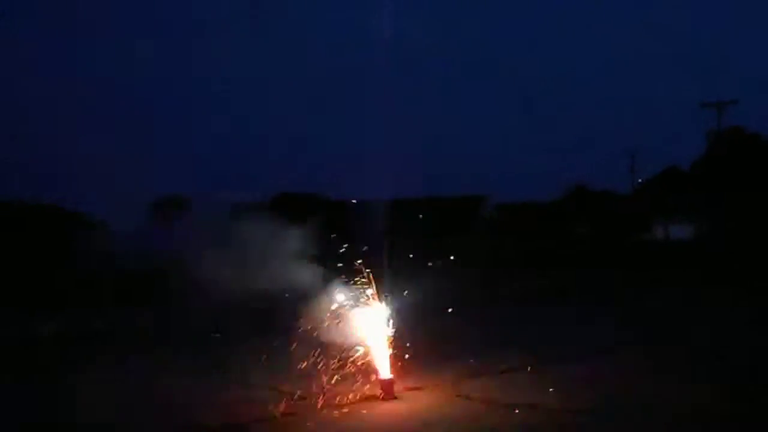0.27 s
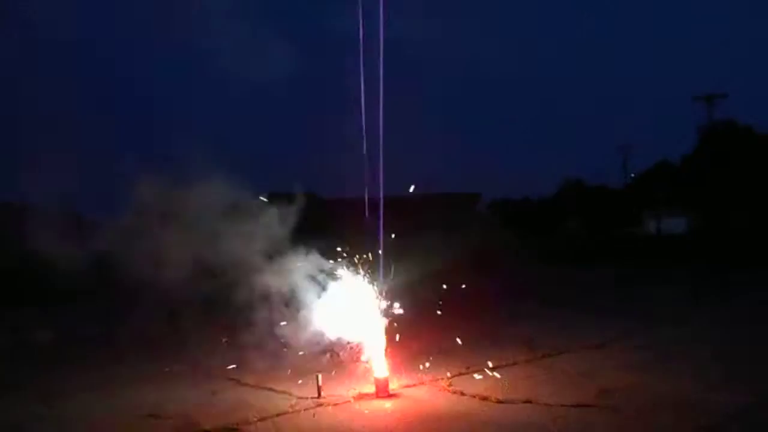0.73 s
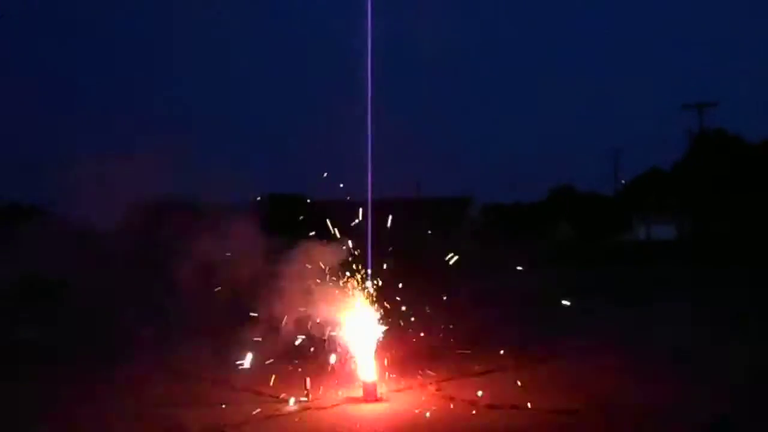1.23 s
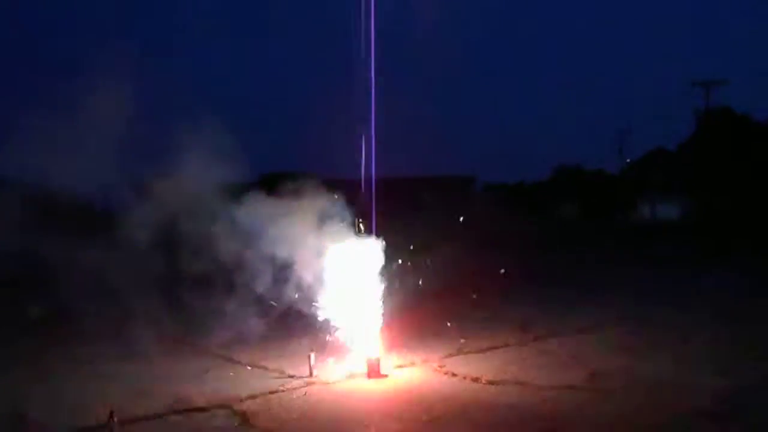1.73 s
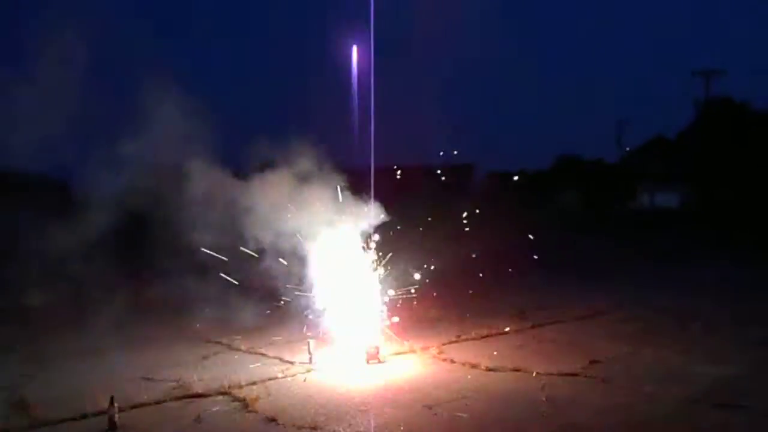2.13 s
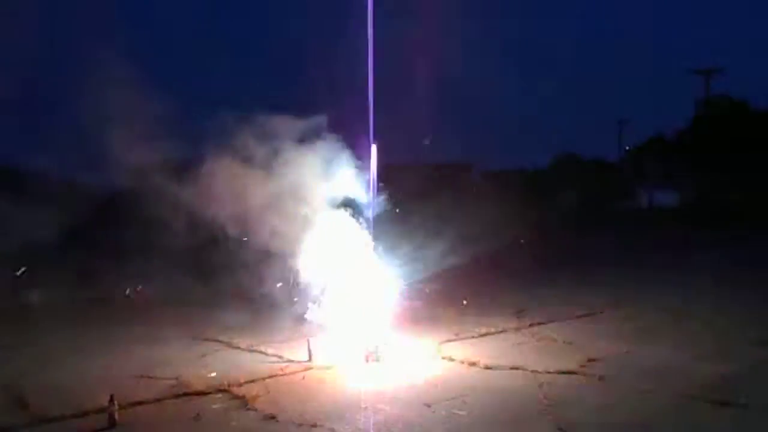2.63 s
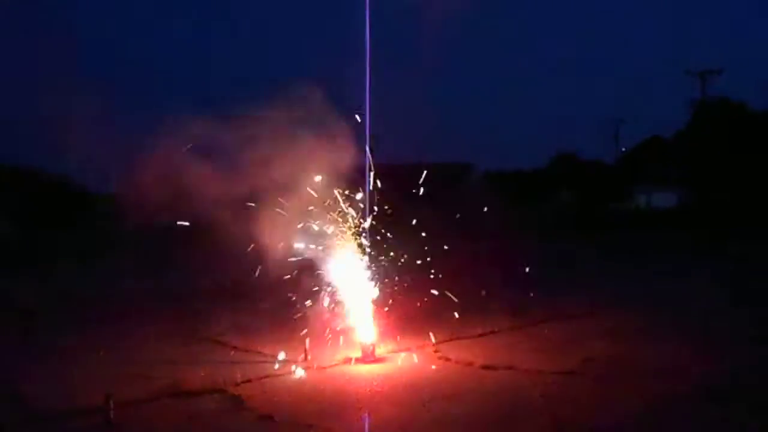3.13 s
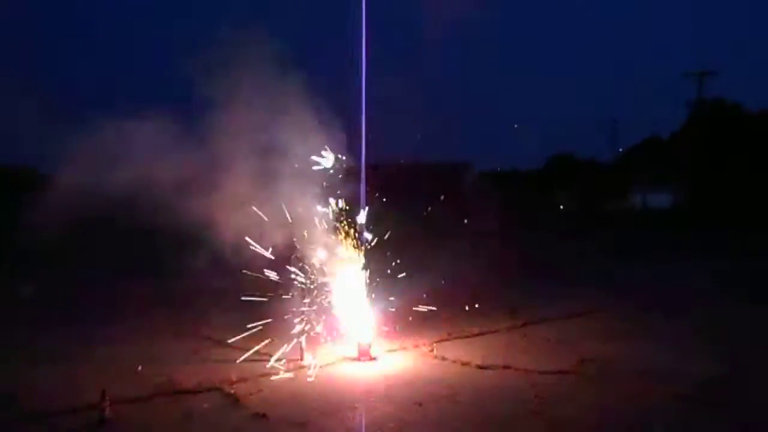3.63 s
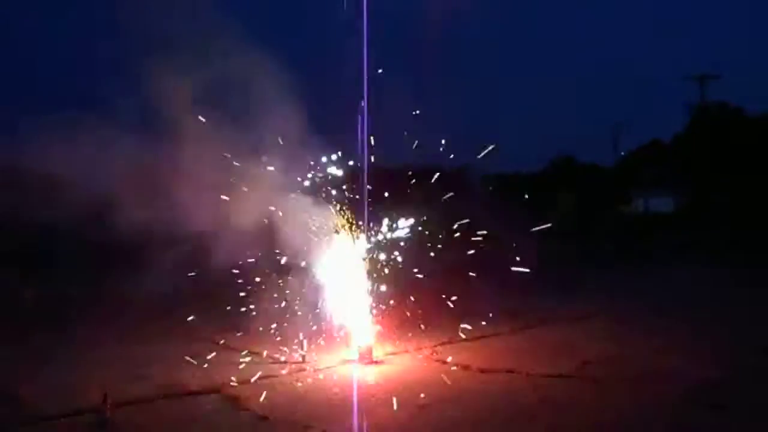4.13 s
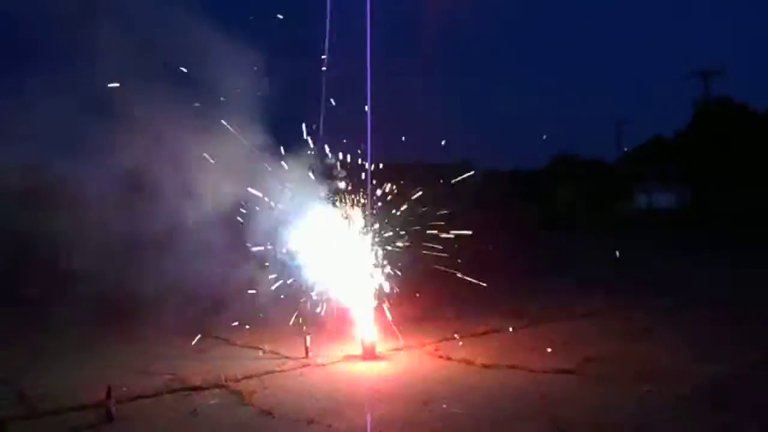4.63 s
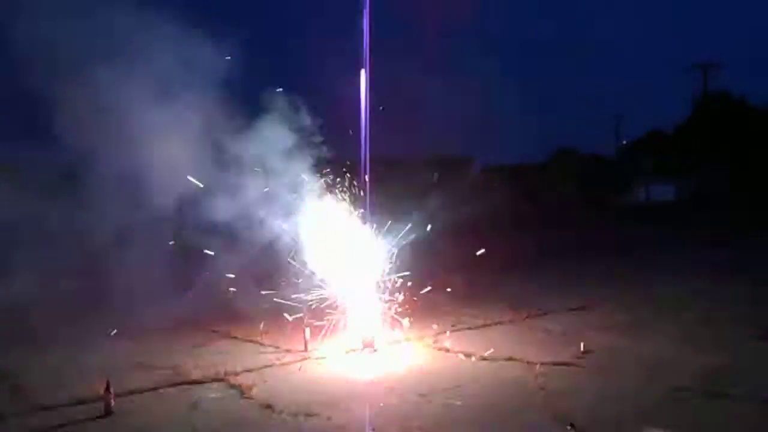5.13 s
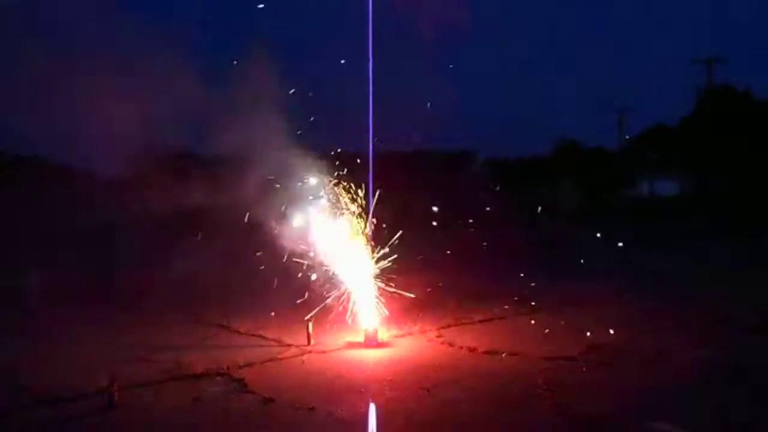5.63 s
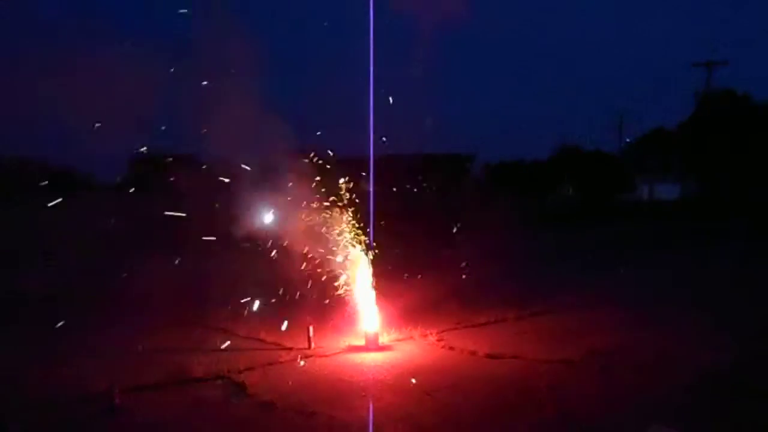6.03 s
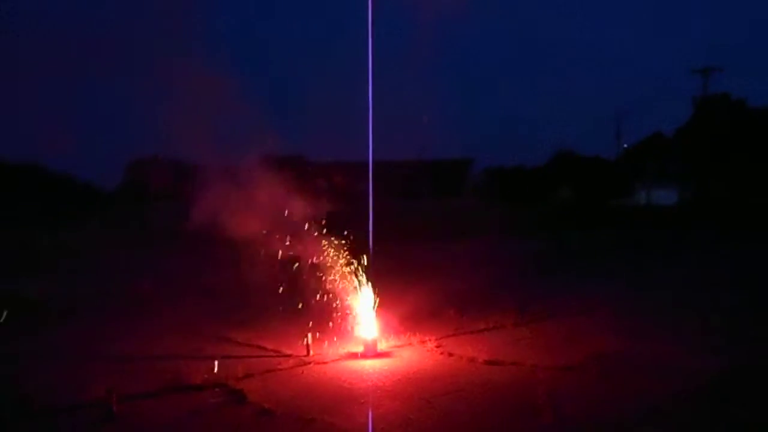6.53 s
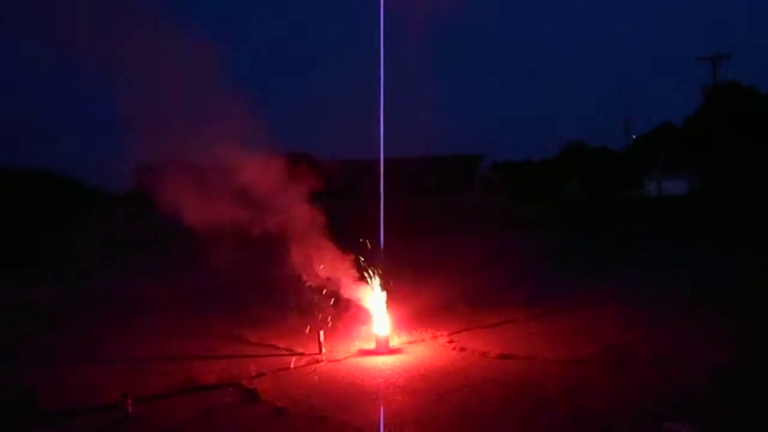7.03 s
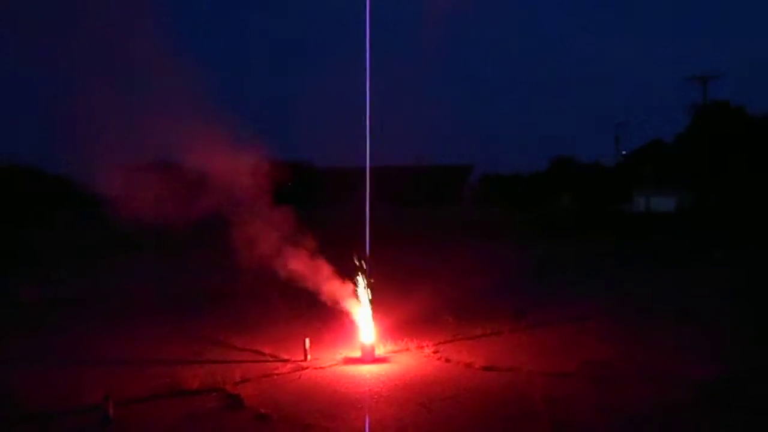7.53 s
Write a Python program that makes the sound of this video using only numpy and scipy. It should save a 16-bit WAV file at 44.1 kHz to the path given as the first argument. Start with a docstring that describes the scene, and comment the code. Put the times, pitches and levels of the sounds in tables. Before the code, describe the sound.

Sharp, irregular firework pops over a faint pulsing hiss give way to a few dull thuds and a louder, steady hiss.

```python
"""Sharp cracks over a soft hiss: a fountain firework burns on a concrete yard, a few metres from a camera.
Its jet of gas swells as each pellet catches and throws out stars, sparks that burst with a tiny shock.
Each crack arrives twice, directly and off the ground, and the loud ones overload the microphone.
A breeze rumbles and a low hum comes and goes. Near the end the stars die out, the nozzle thuds
a few times as the last charge lights, and the hiss grows loud."""
import sys
import numpy as np
from scipy.fft import rfft, irfft, next_fast_len
from scipy.io import wavfile
from scipy.ndimage import map_coordinates

SR = 44100
rng = np.random.default_rng(int(sys.argv[2]) if len(sys.argv) > 2 else 0)


def int16_out(signal):
    """Quantize to a 16-bit WAV file."""
    q = np.round(np.clip(np.atleast_2d(signal).T, -1, 1) * 32767)
    wavfile.write(sys.argv[1], SR, q.astype(np.int16))


N = 342657

# a low hum comes and goes: (time [s], pitch [Hz], level [dB])
HUM_PATH = [(0, 98, -38.5), (1.3, 96.1, -49), (1.6, 92.1, -42.5), (2.2, 89.1, -34.5), (2.5, 92.1, -59),
            (6.3, 135.1, -71), (6.8, 142, -41), (7.77, 139.8, -46.5)]
# a light breeze on the microphone dies down and returns: (time [s], relative level [dB])
BREEZE_LEVELS = [(0, -38), (1.4, -36.5), (1.8, -40.5), (3.0, -40), (3.45, -48), (5.5, -48.5), (6.2, -56.5),
                 (6.4, -39.5), (7.77, -38.5)]
# brief gusts on top of it: (time of peak [s], level [dB])
GUST_PEAKS = [(0.73, -33.5), (1.15, -28.5), (3.73, -35.5)]
# the tone of air pushing on the microphone: (frequency [Hz], relative level [dB])
RUMBLE_SPECTRUM = [(8, -4), (25, 3.5), (45, 2.5), (70, -2), (95, -2), (130, -7), (200, -14.5), (400, -18),
                   (1500, -78)]
# the steady flame sinks halfway through: (time [s], relative level [dB])
FLAME_LEVELS = [(0, -55), (3.0, -52), (3.45, -61.5), (6.2, -59)]
# pellets catch in turn and make the jet flare: (start [s], relative level [dB], burning time [s])
PELLET_BURNS = [(-0.04, -43, 0.13), (0.55, -46.5, 0.38), (0.98, -41.5, 0.23), (1.55, -41.3, 0.32),
                (1.86, -41.5, 0.26), (2.69, -40, 0.15), (3.61, -43.5, 0.34), (4.39, -42, 0.18),
                (5.08, -40.5, 0.17), (5.51, -50.5, 0.32)]
# the hiss as heard, its treble cut off sharply near 12.5 kHz: (frequency [Hz], relative level [dB])
HISS_SPECTRUM = [(300, -31), (1000, 0.5), (1700, 3), (2600, 1.5), (3600, -1), (5000, -1.5), (6500, -5),
                 (8000, -5.5), (10000, -14), (12200, -19), (12700, -48)]
# the tone of the flame: (frequency [Hz], relative level [dB])
ROAR_SPECTRUM = [(60, -38), (140, 0), (250, -1.5), (400, 1.5), (700, 1), (1200, -5), (2000, -16),
                 (5000, -46)]
# the jet's sound moves down into the nozzle as the stars stop: (time [s], clean ground echo [share])
JET_ECHO_SHARE = [(0, .42), (6.4, .42), (7.1, .7)]
# echoes from close to the camera: (delay [ms], relative level [dB])
NEAR_ECHOES = [(2.25, -17), (3.1, -11.5), (3.9, -33), (14.8, -24)]
# dull echoes from things around the yard: (delay [ms], relative level [dB])
FAR_ECHOES = [(21, -31), (34, -26)]
# a bright slap back from a distant wall: (delay [ms], relative level [dB])
WALL_ECHO = [(84.5, -22.5)]
# cracks of stars (the higher the star, the later its ground echo), then six dull thuds in the nozzle:
# (time [s], relative level [dB], shock length [ms], echo delay [ms])
CRACKS_AND_THUDS = [(0.129, 7.5, 0.028, 0.26), (0.1444, 11, 0.066, 0.3), (0.2057, 18.5, 0.0069, 0.33),
                    (0.2413, 8.5, 0.028, 0.46), (0.4115, 3, 0.026, 0.3), (0.4429, 3, 0.034, 0.31),
                    (0.6342, -17.5, 0.14, 0.3), (0.693, -14, 0.22, 0.29), (0.7629, -11.5, 0.031, 0.33),
                    (0.8086, 16.5, 0.029, 0.76), (0.8273, 6.5, 0.03, 0.31), (1.1611, 22, 0.027, 0.51),
                    (1.2602, 11.5, 0.047, 0.54), (1.3319, 8, 0.035, 0.31), (1.3615, 14.5, 0.03, 0.45),
                    (1.7554, 21.5, 0.019, 0.7), (2.0658, 22, 0.037, 0.62), (2.1388, 9, 0.11, 0.83),
                    (2.1918, 1.5, 0.059, 0.33), (2.2363, 8.5, 0.028, 0.37), (2.3462, 8.5, 0.054, 0.717),
                    (2.3963, 4.5, 0.1, 0.85), (2.4162, 3, 0.087, 0.87), (2.6037, -5, 0.098, 0.99),
                    (2.8539, 23, 0.028, 0.78), (2.892, 13.5, 0.054, 0.65), (2.9058, 15, 0.008, 0.32),
                    (2.9727, 8, 0.018, 0.31), (3.0213, -13.6, 0.059, 0.34), (3.045, 13.5, 0.012, 0.66),
                    (3.1765, -7.5, 0.037, 0.33), (3.2173, 6.5, 0.02, 1.07), (3.2408, -3.5, 0.016, 0.31),
                    (3.2868, 8.5, 0.029, 0.96), (3.4164, 0.5, 0.031, 0.65), (3.4433, 5.5, 0.026, 0.9),
                    (3.4463, 4, 0.031, 1.16), (3.8029, 13.5, 0.05, 0.86), (3.9355, 14, 0.022, 0.78),
                    (3.9789, 11, 0.029, 0.95), (4.0689, 11.5, 0.032, 1.02), (4.1939, 5, 0.031, 0.48),
                    (4.2047, 8, 0.02, 1.08), (4.2339, -1.5, 0.044, 1.17), (4.2447, 2, 0.052, 0.87),
                    (4.5105, 15.5, 0.013, 0.97), (4.6121, 10, 0.059, 2.27), (4.6685, 6, 0.029, 1.13),
                    (4.7167, 5, 0.045, 0.92), (4.7768, 5, 0.026, 1.51), (4.8902, -10.5, 0.053, 0.34),
                    (4.9452, 5, 0.014, 0.74), (4.9584, 6, 0.021, 1.22), (5.2375, 13, 0.029, 0.59),
                    (5.3087, 7, 0.022, 0.46), (5.3252, 7.5, 0.028, 0.76), (5.3513, 8.5, 0.037, 1.15),
                    (5.4892, 14, 0.015, 0.92), (5.4927, 11, 0.022, 1.21), (5.6685, 7.5, 0.028, 0.42),
                    (5.831, 3, 0.019, 0.83), (5.8704, 3.5, 0.037, 1.77), (5.8809, 4, 0.04, 1.18),
                    (5.9655, 9, 0.019, 1.6), (6.0864, 6.5, 0.012, 0.99), (6.3305, -2.5, 0.37, 2.44),
                    (6.4595, -11, 0.35, 0.74), (6.571, -16, 0.5, 2.87), (6.779, -10.5, 0.33, 1.08),
                    (6.887, -12.5, 0.32, 2.2), (6.938, -13, 0.24, 0.84)]
# the camera dulls the highest treble: (frequency [Hz], gain [dB])
CAMERA_TONE = [(20, 1.5), (9900, 1), (10500, -3), (11000, -14.5), (11800, -12), (12500, -29),
               (15500, -28.5)]
TOP_HZ = 16800  # the camera keeps nothing above this


def amp(db):
    """Turn decibels into a factor to multiply by."""
    return 10 ** (np.asarray(db) / 20)


def unit(x):
    """Scale a signal to an average (rms) level of 1."""
    return x / np.sqrt(np.mean(x ** 2) + 1e-20)


def along(points, hz):
    """Gain at each frequency, joining (frequency [Hz], level [dB]) points on a log axis."""
    point_hz, db = np.transpose(points)
    return amp(np.interp(np.log(hz + 1), np.log(point_hz + 1), db))


def curve(rows):
    """Join (time [s], value) rows with straight lines, one value per sample."""
    return np.interp(np.arange(N) / SR, *np.transpose(rows))


def wobble(rate):
    """A smooth curve through `rate` random values a second."""
    return map_coordinates(rng.standard_normal(int(N * rate / SR) + 4), [np.arange(N) * rate / SR])


def filtered(x, response):
    """Apply a filter: response(hz) says how each frequency is scaled and delayed."""
    size = next_fast_len(N + SR // 2)
    return irfft(rfft(x, size) * response(np.fft.rfftfreq(size, 1 / SR)), size)[:N]


def noise(spectrum):
    """Noise with the given tone, at level 1."""
    return unit(filtered(rng.standard_normal(N), lambda hz: along(spectrum, hz)))


def lag(hz, ms):
    """A filter that delays the sound."""
    return np.exp(-2j * np.pi * hz * ms / 1000)


def relax(hz, ms):
    """A filter that makes a click die away over about `ms`, dulling it."""
    return 1 / (1 + 2j * np.pi * hz * ms / 1000)


def resonance(hz, centre_hz, q):
    """A filter that rings at one pitch, longer for a higher q."""
    return 1j * hz * centre_hz / q / (centre_hz ** 2 - hz ** 2 + 1j * hz * centre_hz / q)


def hum(waver_db, drift_hz):
    """A low drone that wavers in level and pitch."""
    times, hz, db = np.transpose(HUM_PATH)
    pitch = curve(np.c_[times, hz]) + drift_hz * wobble(22)
    level_db = curve(np.c_[times, db]) + waver_db * wobble(12)
    return amp(level_db) * np.sin(2 * np.pi * np.cumsum(pitch) / SR)


def rumble(breeze_db, flare_db, lumps_db, gust_half_s=0.11):
    """Air hits the microphone in soft lumps: the breeze, its gusts and a low puff with every flare."""
    t = np.arange(N) / SR
    breeze = amp(curve(BREEZE_LEVELS) + breeze_db)
    gusts = sum(amp(db) * np.exp(-((t - peak_s) / gust_half_s) ** 2) for peak_s, db in GUST_PEAKS)
    puffs = amp(flare_db) * np.sqrt(pellets())
    lumps = unit(amp(lumps_db * wobble(13)) * noise(RUMBLE_SPECTRUM))
    return np.hypot(breeze + gusts, puffs) * lumps


def pellets(catch_s=0.17, fade_db_per_s=52):
    """Power of the jet's flares: each pellet catches, burns and fades once spent."""
    t, power = np.arange(N) / SR, np.zeros(N)
    for start_s, db, burn_s in PELLET_BURNS:
        rise = np.clip((t - start_s) / catch_s, 0, 1)
        spent_s = np.maximum(t - start_s - burn_s, 0)
        power += (rise * amp(db - fade_db_per_s * spent_s)) ** 2
    return power


def last_charge(start_s=6.257, catch_s=0.034, settle_s=0.47, full_db=-27, growth_db=23):
    """Power of the last charge: it catches at once, then grows into the loud hiss."""
    age = np.maximum(np.arange(N) / SR - start_s, 0)
    level_db = full_db - growth_db * np.exp(-age / settle_s)
    return (np.minimum(age / catch_s, 1) * amp(level_db)) ** 2


def jet(hiss_db, roar_db, roar_slope, sputter_db, ground_ms=0.316):
    """Gas hisses from the nozzle and roars in the flame; its ground echo cancels some frequencies."""
    thrust_db = 10 * np.log10(amp(curve(FLAME_LEVELS)) ** 2 + pellets() + last_charge())
    sputter = sputter_db * wobble(170) + .5 * wobble(25)
    hiss = amp(thrust_db + hiss_db + sputter) * noise(HISS_SPECTRUM)
    # a slope below 1 makes the roar grow more slowly than the hiss
    roar = amp(roar_slope * thrust_db + roar_db + sputter + 0.32 * wobble(40)) * noise(ROAR_SPECTRUM)
    gas, share = hiss + roar, curve(JET_ECHO_SHARE)
    echo = filtered(gas, lambda hz: lag(hz, ground_ms))
    return (gas + share * echo) / np.hypot(1, share)


def smear(fade_s, count, size):
    """Rough surfaces scatter each click into its own noise, which falls 60 dB in fade_s."""
    dying = rng.standard_normal((count, size)) * amp(-60 * np.arange(size) / SR / fade_s)
    return rfft(dying / np.linalg.norm(dying, axis=1, keepdims=True))


def echoes(table, hz, count):
    """Delayed copies, timed a little differently for each burst."""
    return sum(amp(db) * lag(hz, ms + 0.16 * rng.standard_normal((count, 1))) for ms, db in table)


def yard(hz, count, size):
    """One filter per burst for its paths to the camera: straight there and bounced around the yard."""
    near = echoes(NEAR_ECHOES, hz, count) * (0.58 + 0.52 * smear(0.0059, count, size)) * relax(hz, 0.038)
    far_tone = (0.23 + resonance(hz, centre_hz=1500, q=3.1)) * relax(hz, 0.023)
    far = echoes(FAR_ECHOES, hz, count) * (0.86 + 0.63 * smear(0.0058, count, size)) * far_tone
    slap = echoes(WALL_ECHO, hz, count) * smear(0.006, count, size) * 0.89 * relax(hz, 0.047)
    scatter = amp(-15) * smear(0.045, count, size) * relax(hz, 0.0061)
    tail = amp(-28.5) * smear(0.19, count, size) * relax(hz, 0.011)
    camera_ring = amp(-2) * smear(0.0023, count, size) * resonance(hz, centre_hz=5320, q=0.83)
    return 1 + near + far + slap + scatter + tail + camera_ring


def microphone(hz):
    """Shocks ring the microphone's opening and hollow case; its membrane swings back slowly."""
    opening = (1 + 1.18 * resonance(hz, centre_hz=9060, q=1.64)) * relax(hz, 0.014)
    case = 1 + 0.26 * resonance(hz, centre_hz=640, q=5.4)
    bass_hz, bass_q = 140, 0.65
    swing = hz ** 2 / (bass_hz ** 2 - hz ** 2 + 1j * hz * bass_hz / bass_q)
    return opening * case * swing


def sparks(loudest_db, spread_db, length_ms, count=100, end_s=6.1):
    """Faint sparks snap at random times and heights: rows like those of CRACKS_AND_THUDS."""
    when, faintness, length, height = rng.random((count, 4)).T
    level_db = loudest_db - spread_db * np.sqrt(faintness)
    return np.c_[when * end_s, level_db, length_ms * (.5 + length), .3 + height]


def shocks(bursts, echo_share, rounding, size=8192):
    """Each burst is a jump in air pressure that dies away, followed by a quick echo."""
    hz, out = np.fft.rfftfreq(size, 1 / SR), np.zeros(N + size)
    times, db, length_ms, echo_ms = np.transpose(bursts)[..., None]
    area = amp(db) * length_ms * SR / 1000
    rise_ms = rounding * length_ms ** 2  # long shocks rise softly
    jump = area * relax(hz, length_ms) * relax(hz, rise_ms) * (hz < TOP_HZ)
    with_echo = 1 + echo_share * lag(hz, echo_ms)
    waves = irfft(jump * with_echo * yard(hz, len(bursts), size))
    lead = size // 128  # room for the ripple just before each jump
    for time_s, wave in zip(times[:, 0], waves):
        start = max(round(time_s * SR) - lead, 0)
        out[start:start + size] += np.roll(wave, lead)
    return out[:N]


def crackle():
    """Shock waves from stars, sparks and thuds in the nozzle strike the microphone."""
    bursts = np.vstack([CRACKS_AND_THUDS, sparks(loudest_db=-17.5, spread_db=25, length_ms=0.053)])
    return filtered(shocks(bursts, echo_share=0.63, rounding=0.52), microphone)


def scene():
    """Crackle over the jet, the rumble and the hum, in one channel."""
    gas = jet(hiss_db=-0.54, roar_db=-13.5, roar_slope=0.8, sputter_db=1.1)
    air = rumble(breeze_db=-0.5, flare_db=4.5, lumps_db=3.5)
    return (crackle() + gas + air + hum(waver_db=1.5, drift_hz=6.07))[None]


def record(dry):
    """The overloaded microphone flattens loud peaks, then the camera dulls and cuts the top treble."""
    ceiling = 0.53
    clipped = np.clip(dry[0], -ceiling, ceiling)
    return filtered(clipped, lambda hz: along(CAMERA_TONE, hz) * (hz < TOP_HZ))[None]


dry = scene()
out = record(dry)
int16_out(out)
```